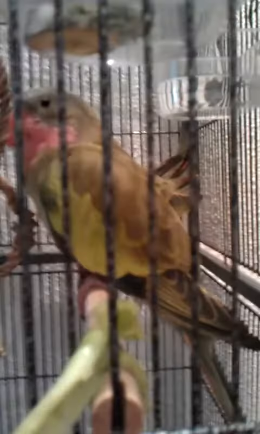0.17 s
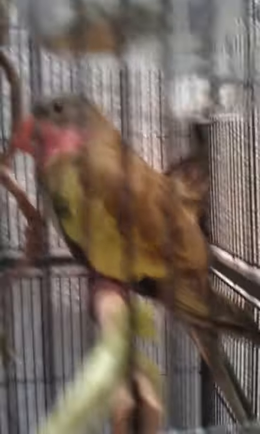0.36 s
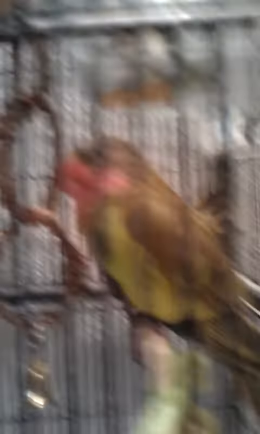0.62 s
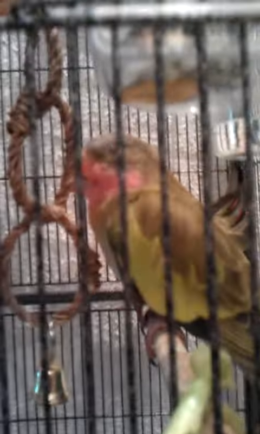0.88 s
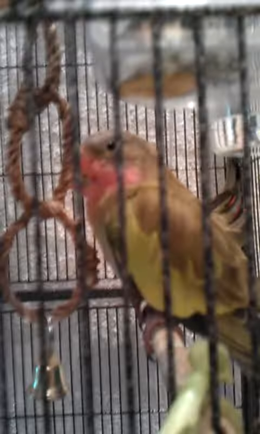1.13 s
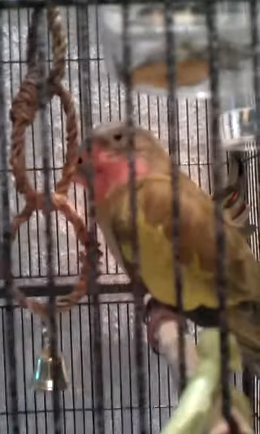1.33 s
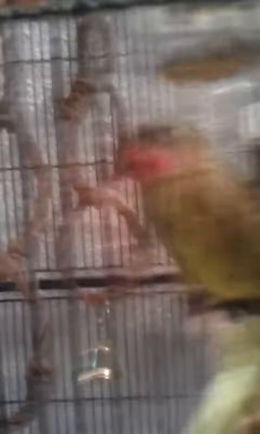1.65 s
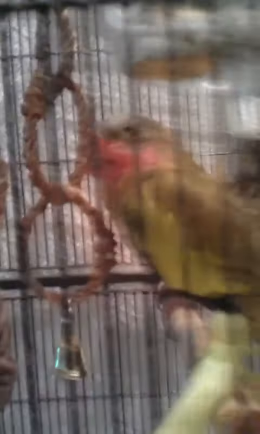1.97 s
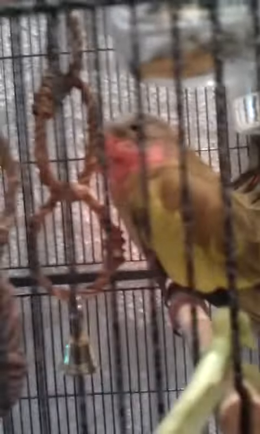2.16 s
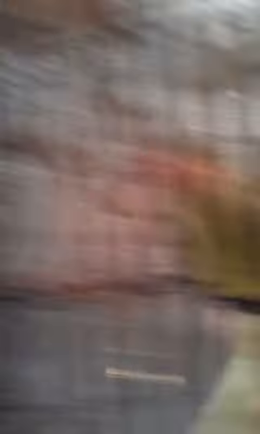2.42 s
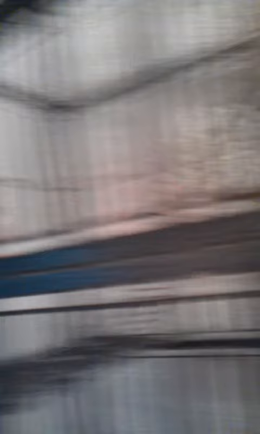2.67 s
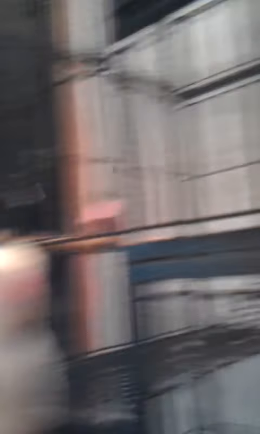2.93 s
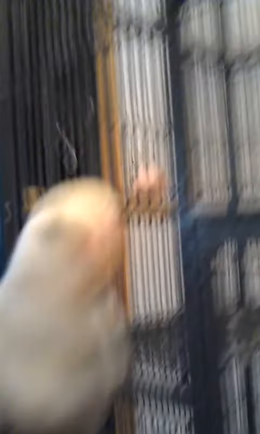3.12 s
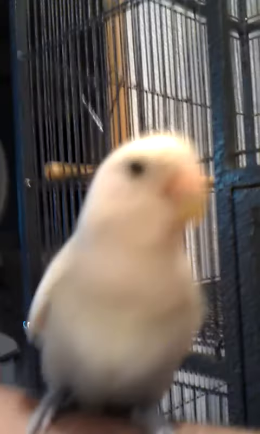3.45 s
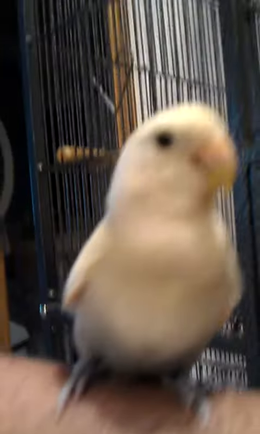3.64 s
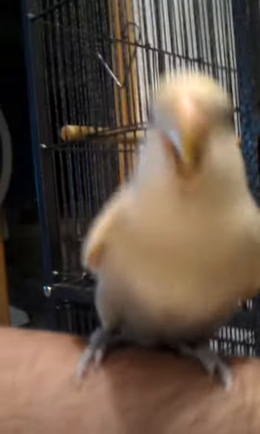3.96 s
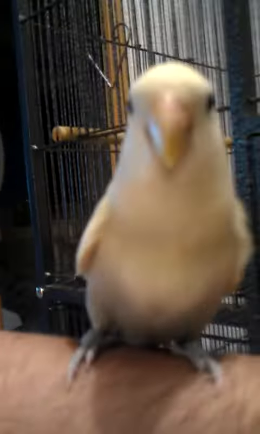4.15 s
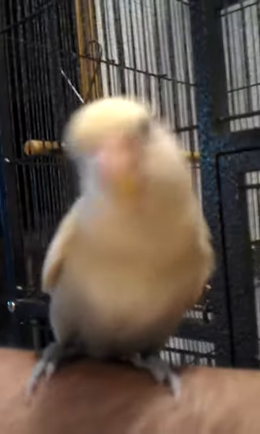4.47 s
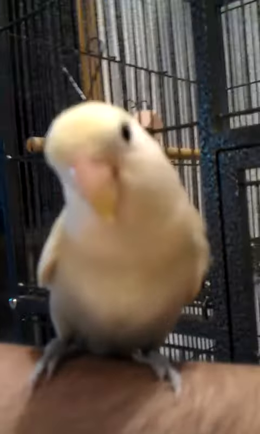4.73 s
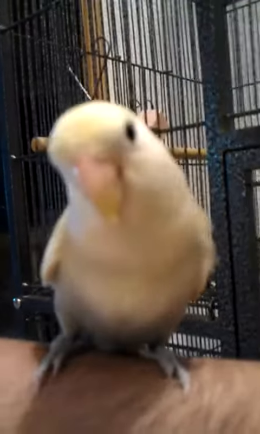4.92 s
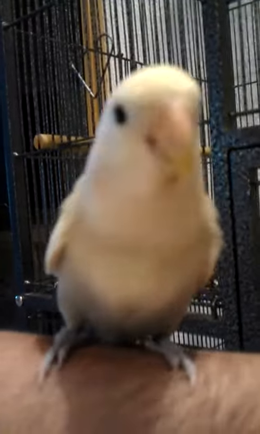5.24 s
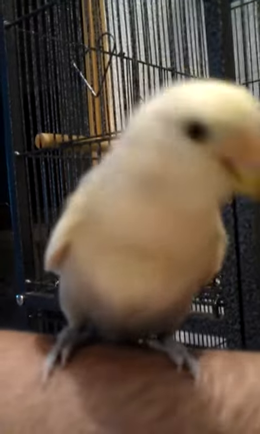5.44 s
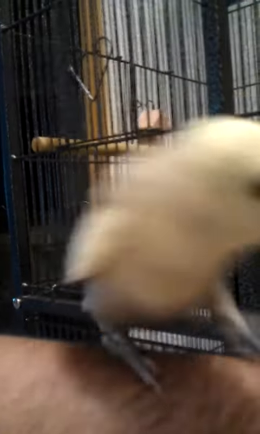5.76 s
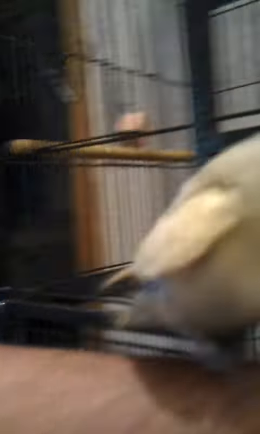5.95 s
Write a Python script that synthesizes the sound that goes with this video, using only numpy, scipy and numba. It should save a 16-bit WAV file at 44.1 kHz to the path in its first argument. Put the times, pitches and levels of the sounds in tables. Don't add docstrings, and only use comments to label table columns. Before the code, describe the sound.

A small parrot close by gives two short, piercing, distorted screeches in a hard echoing room, with faint distant chirps answering from other birds.

```python
import sys
import numpy as np
from scipy import signal
from scipy.fft import rfft, irfft
from scipy.io import wavfile
from scipy.ndimage import uniform_filter1d
from numba import njit

SR = 44100
rng = np.random.default_rng(int(sys.argv[2]) if len(sys.argv) > 2 else 0)


def to_wav(s):
    ch = np.atleast_2d(s).T
    pcm = np.round(np.clip(ch, -1, 1) * 32767)
    wavfile.write(sys.argv[1], SR, pcm.astype(np.int16))


def gain_from_db(level_db):
    decades = np.asarray(level_db, float) / 20
    return 10 ** decades


N = 269010


def evened(x):
    return x / np.sqrt(np.mean(x ** 2) + 1e-20)


def read(points, hz):
    point_hz, value = np.transpose(points)
    return np.interp(np.log(hz + 1), np.log(point_hz + 1), value)


def add(mix, start_s, sound):
    part = mix[round(start_s * SR):][:len(sound)]
    part += sound[:len(part)]


def glide(length_s, first_hz, last_hz):
    return np.linspace(first_hz, last_hz, round(length_s * SR))


def unrolled(curve):
    point_s, point_hz = np.transpose(curve)
    t = np.arange(point_s[0], point_s[-1], 1 / SR)
    return t, np.interp(t, point_s, point_hz)


def whistle(hz, effort_db, pipe_hz, slope_db, rough, edge_s, size):
    shake = rng.standard_normal((8820, 2))
    shake = uniform_filter1d(shake, size=size, axis=0) * np.sqrt(size)
    shake = uniform_filter1d(shake, size=size // 2, axis=0)
    shake = shake[np.arange(len(hz)) % len(shake)]
    turns = np.cumsum(hz * (1 + rough * shake[:, 0])) / SR

    k = np.arange(1, 7)[:, None]
    air_db = -5 * np.maximum(k * hz / 10000 - 1, 0) / .2
    octaves = np.log2(k * hz / pipe_hz)
    pipe_db = -slope_db * np.maximum(-octaves, 1.5 * octaves)
    weight = gain_from_db(air_db + pipe_db)
    lean = 1.4 * (k == 1)
    overtones = weight * np.sin(2 * np.pi * k * turns + lean)
    tone = overtones.sum(0) / np.linalg.norm(weight, axis=0)

    count = np.arange(len(hz))
    edge = np.minimum(count, count[::-1]) / (edge_s * SR)
    tremble = 1 + 2.0 * rough * shake[:, 1]
    return np.sqrt(2) * gain_from_db(effort_db) * tone * tremble * np.minimum(edge, 1)


# time_s, pitch_hz
FIRST_PITCH = [
    [(1.032, 2050), (1.038, 2400), (1.0435, 2550)],
    [(1.043, 2550), (1.046, 3200), (1.048, 2350), (1.051, 3100), (1.055, 2550), (1.0573, 3180)],
    [(1.057, 3180), (1.062, 3050), (1.070, 3190), (1.078, 3280), (1.088, 3260)],
    [(1.0875, 4400), (1.092, 5200)],
    [(1.0915, 6700), (1.102, 7100), (1.107, 7000), (1.110, 6150), (1.113, 6700), (1.1205, 5700)],
    [(1.120, 4450), (1.140, 3950), (1.156, 4100), (1.170, 4220), (1.181, 4370), (1.192, 4230)],
]
# time_s, pitch_hz
SECOND_PITCH = [
    [(3.8268, 1750), (3.831, 2000), (3.838, 2800), (3.848, 3210), (3.858, 3120), (3.883, 3400),
     (3.885, 3800), (3.888, 3800)],
    [(3.886, 5050), (3.892, 5250), (3.898, 4700)],
    [(3.897, 3500), (3.902, 2950), (3.906, 3250), (3.9115, 2900)],
    [(3.911, 2600), (3.9223, 2600)],
    [(3.922, 2600), (3.929, 3225), (3.934, 3300), (3.939, 3190), (3.948, 3375), (3.952, 3600)],
    [(3.950, 4650), (3.955, 4850), (3.9635, 4800)],
    [(3.962, 3350), (3.966, 2830), (3.972, 2750), (3.977, 3250), (3.990, 3200)],
]
# full_effort_pitch_hz, full_effort_db, pipe_slope_db_per_octave, roughness_0_to_1
FIRST_VOICE = [(2700, 1, 11, .03), (2900, 4, 10, .06), (3100, 8, 9, .008), (4800, 5, 25, .03),
               (7000, 12, 25, .012), (4000, 8, 11, .009)]
SECOND_VOICE = [(3100, 8, 19, .018), (5100, 5, 25, .03), (3300, 3, 12, .1), (2600, 2, 13, .06),
                (3100, 8, 17, .018), (4700, 7, 12, .035), (2900, 3, 15, .04)]
SAG_DB_PER_OCTAVE, SLACK_DB = 25.5, 7.5
SLACK_SLOPE_DB, SLACK_ROUGH = 10.5, .025
PIPE_LOWEST, REGISTER_HZ = .88, 3900
SWELL_DB, SWELL_S, FADE_DB, FADE_S = -12, .003, -21.5, .009


def near_bird():
    out = np.zeros(N)
    for curves, voices in ((FIRST_PITCH, FIRST_VOICE), (SECOND_PITCH, SECOND_VOICE)):
        start_s, end_s = curves[0][0][0], curves[-1][-1][0]
        for curve, (full_hz, full_db, slope_db, rough) in zip(curves, voices):
            t, hz = unrolled(curve)
            sag_db = SAG_DB_PER_OCTAVE * np.maximum(np.log2(full_hz / hz), 0)
            slack = np.minimum(sag_db / SLACK_DB, 1)
            swell_db = SWELL_DB * np.exp((start_s - t) / SWELL_S)
            fade_db = FADE_DB * np.exp((t - end_s) / FADE_S)
            effort_db = full_db - sag_db + swell_db + fade_db
            overtone = 2 if full_hz < REGISTER_HZ else 1
            pipe_hz = overtone * np.maximum(hz, PIPE_LOWEST * full_hz)
            slope_now_db = slope_db + slack * (SLACK_SLOPE_DB - slope_db)
            rough_now = rough + SLACK_ROUGH * slack
            note = whistle(hz, effort_db, pipe_hz, slope_now_db, rough_now, edge_s=0.0001, size=30)
            add(out, t[0], note)
    return out


# start_s, length_s, first_pitch_hz, last_pitch_hz, effort_db
CHIRPS = [(2.266, 0.033, 4900, 8550, -48.5), (2.304, 0.033, 5920, 5030, -55),
          (2.31, 0.029, 8530, 6530, -44), (2.344, 0.074, 7620, 7270, -47.5), (3.557, .05, 6830, 7590, -43),
          (3.606, 0.033, 4700, 8000, -42), (3.625, 0.033, 6850, 6800, -39.5),
          (3.97, 0.041, 3353, 3297, -34.5), (4.258, 0.092, 6625, 6400, -29.5),
          (4.406, 0.044, 5920, 3260, -42.5), (4.492, 0.04, 4776, 7250, -36.5),
          (4.538, 0.08, 6550, 6807, -30.5), (4.686, 0.038, 3700, 2265, -51.5),
          (4.777, 0.037, 7960, 5155, -33), (4.819, 0.061, 6800, 6483, -28),
          (4.915, 0.036, 6730, 4910, -29.5), (5.091, 0.041, 5790, 7570, -36), (5.139, .04, 8306, 4000, -34),
          (5.191, 0.034, 6630, 3460, -33.5), (5.361, 0.032, 2435, 3705, -46.5),
          (5.407, 0.067, 3413, 3330, -47.5), (5.467, 0.064, 7110, 5440, -31),
          (5.505, 0.058, 6705, 5866, -31.5), (5.498, 0.049, 5475, 4020, -42.5)]


def far_birds():
    out = np.zeros(N)
    for start_s, length_s, first_hz, last_hz, effort_db in CHIRPS:
        hz = glide(length_s, first_hz, last_hz)
        ends = np.linspace(-1, 1, len(hz)) ** 2
        rough = 0.0401 * (1 + 1.5 * ends)
        add(out, start_s, whistle(hz, effort_db - 4 * ends, hz, 34, rough, edge_s=0.01, size=80))
    return out


# frequency_hz, decay_to_minus_60_db_s
ROOM = [(1500, 0.46), (3200, 0.99), (4200, 0.91), (6500, 0.81), (8600, 0.68), (10000, 0.51), (12600, 0.62),
        (15000, 0.45)]


def room(x, build_s, longer):
    hz, t, z = signal.stft(rng.standard_normal(2 * SR), SR, nperseg=256)
    fall_db = -60 * t / (longer * read(ROOM, hz)[:, None])
    next_room_db = -28.5 + 0.4 * fall_db
    tail = signal.istft(z * (gain_from_db(fall_db) + gain_from_db(next_room_db)), SR, nperseg=256)[1]
    tail = tail * (1 - np.exp(-np.arange(len(tail)) / (build_s * SR)))
    return signal.fftconvolve(x, tail / np.linalg.norm(tail))[:N]


# start_s, length_s, first_pitch_hz, last_pitch_hz, level_db
SQUEAK = (.33, .23, 7350, 6050, -78)
# start_s, peak_db, centre_hz
TICKS = [
    (1.021, -33, 6800),
    (2.959, -49, 1490),
    (3.649, -44, 1200),
]


def small_sounds():
    out, t = np.zeros(N), np.arange(200) / SR
    start_s, length_s, first_hz, last_hz, level_db = SQUEAK
    hz = glide(length_s, first_hz, last_hz)
    add(out, start_s, whistle(hz, level_db, hz, 30, 0.0062, edge_s=0.025, size=30))
    for start_s, peak_db, centre_hz in TICKS:
        ring = np.exp(-t * centre_hz * 1.5) * np.sin(2 * np.pi * centre_hz * t)
        add(out, start_s, gain_from_db(peak_db) * ring)
    return out


# frequency_hz, density_db_per_hz
HISS = [(15, -21.5), (25, -17), (53, -8.5), (105, -9.5), (130, -11.5), (200, -5.5), (229, -10),
        (439, -10.5), (476, -12.5), (863, -15), (5000, -22), (14800, -25.5), (16000, -28.5)]
HISS_DB = -61
# frequency_hz, width_hz, level_db
HUM = [
    (51.6, 2.7, -68.5),
    (98.7, 4.3, -72),
    (202.4, 2.8, -72),
]


def background():
    hz = np.fft.rfftfreq(2048, 1 / SR)
    a, b, patches = rng.standard_normal((N // 512 + 5, 1025, 3)).T
    patches = uniform_filter1d(patches, size=20, axis=0)
    patches = evened(uniform_filter1d(patches, size=8, axis=1))
    z = (a + 1j * b) * gain_from_db(read(HISS, hz)[:, None] + 1.8 * patches)
    hiss = signal.istft(z, nperseg=2048, noverlap=1536)[1][:N]
    out = gain_from_db(HISS_DB) * evened(hiss)

    fine_hz = np.fft.rfftfreq(N, 1 / SR)
    for tone_hz, width_hz, level_db in HUM:
        around = np.exp(-((fine_hz - tone_hz) / width_hz) ** 2)
        band = irfft(rfft(rng.standard_normal(N)) * around, N)
        steady = np.sin(2 * np.pi * tone_hz * np.arange(N) / SR)
        out = out + gain_from_db(level_db) * evened(evened(band) + 1.6 * steady)
    return out


def scene():
    near = gain_from_db(0.5) * near_bird()
    echo = gain_from_db(-11.0) * room(near, build_s=0.0013, longer=0.62)
    far = gain_from_db(1.5) * room(far_birds(), build_s=.022, longer=0.98)
    return (near + echo + far + background() + small_sounds())[None]


@njit
def follower(power, attack, release):
    out, held = np.empty_like(power), 0.
    for i in range(len(power)):
        held += (attack if power[i] > held else release) * (power[i] - held)
        out[i] = held
    return out


def overloaded(dry):
    ceiling = .85
    fine = signal.resample_poly(dry, up=3, down=1, axis=1)
    flat = signal.resample_poly(np.clip(fine, -ceiling, ceiling), up=1, down=3, axis=1)
    return flat - 0.84 * uniform_filter1d(flat * (abs(dry) > ceiling), size=600)


def limited(x):
    attack_s, release_s = .0015, .011
    smooth = uniform_filter1d(x[0] ** 2, size=100)
    power = follower(smooth, 1 / (attack_s * SR), 1 / (release_s * SR))
    power_db = 10 * np.log10(power + 1e-12)
    return x / gain_from_db(0.94 * np.maximum(power_db + 18.0, 0))


# frequency_hz, band_floor_db_per_hz (under the moment's power),
# line_floor_db_per_hz
SILENCE_FLOORS = [(100, 80, -130), (300, 72, -118), (700, 68.5, -113), (1500, 68, -112), (2200, 70, -112),
                  (4500, 71, -114), (7500, 70, -116), (8800, 62, -111), (10500, 61, -110), (12600, 69, -111),
                  (15500, 66, -113)]


def thinned(x):
    hz, t, z = signal.stft(x, SR, window="cosine", nperseg=1536, noverlap=768, scaling="psd")
    line = 2 * abs(z) ** 2
    band = np.repeat(line[:768].reshape(64, 12, -1).mean(1), 12, axis=0)
    band = np.vstack([band, band[-1:]])
    under_db = read([(row[0], row[1]) for row in SILENCE_FLOORS], hz)[:, None]
    faint_db = read([(row[0], row[2]) for row in SILENCE_FLOORS], hz)[:, None]
    total = line.sum(0) * hz[1]
    kept = (band > total * gain_from_db(-2 * under_db)) & (line > gain_from_db(2 * faint_db))
    kept &= hz[:, None] < 15870
    return signal.istft(z * kept, SR, window="cosine", nperseg=1536, noverlap=768, scaling="psd")[1][:N]


def top_cut(x):
    return signal.sosfilt(signal.butter(12, 16960, fs=SR, output="sos"), x)


def record(dry):
    mix = thinned(limited(overloaded(dry))[0])[None]
    return top_cut(mix)


dry = scene()
out = record(dry)
to_wav(out)
```